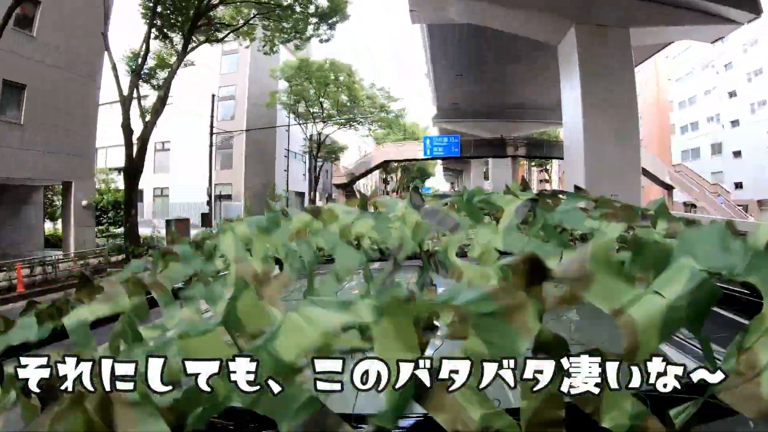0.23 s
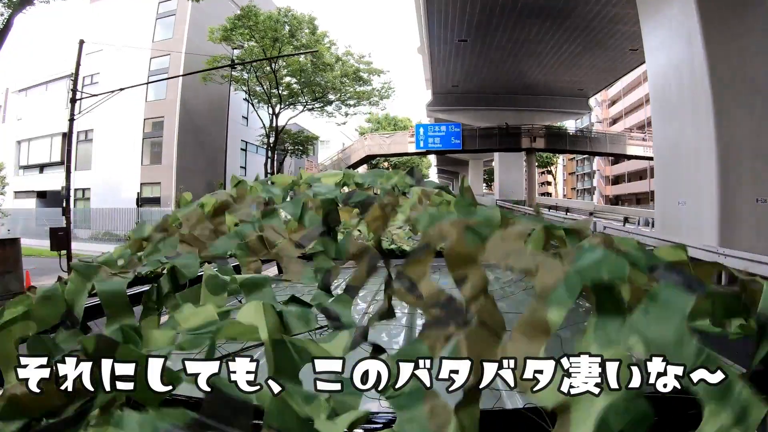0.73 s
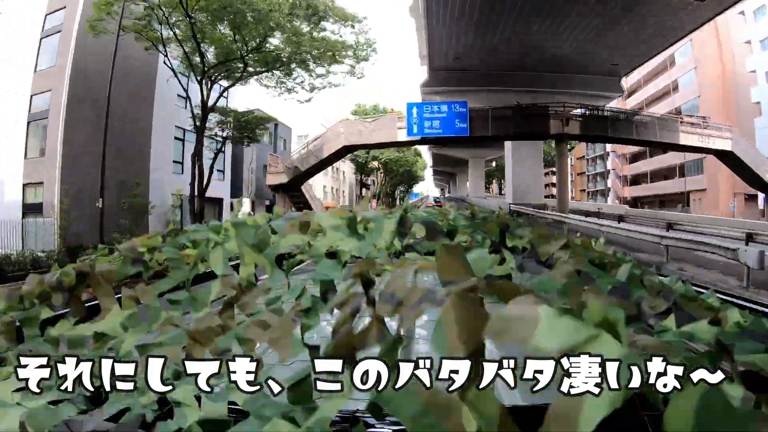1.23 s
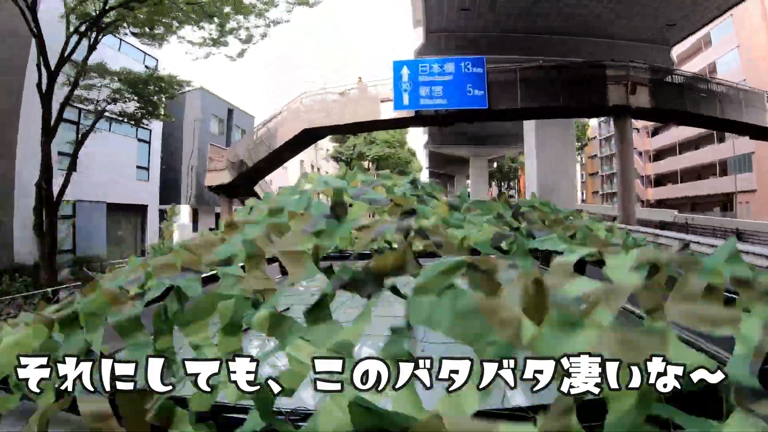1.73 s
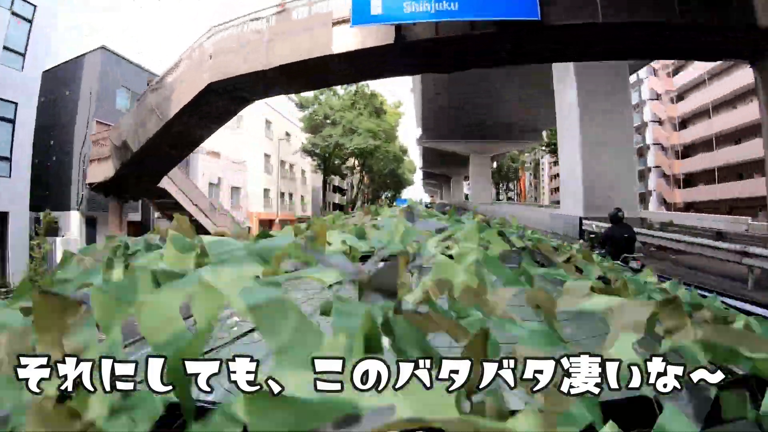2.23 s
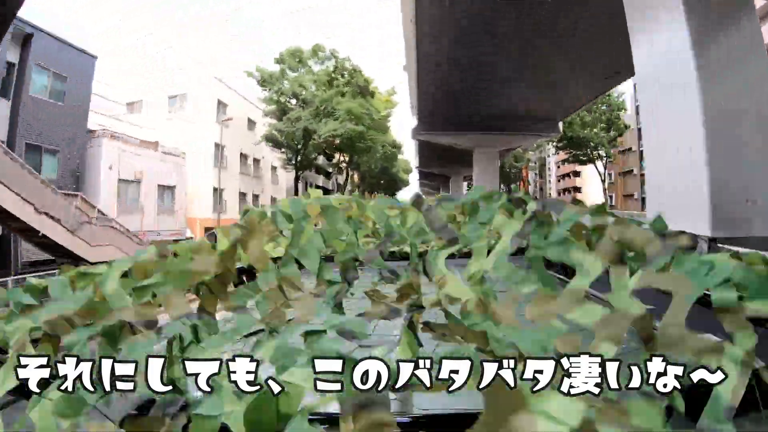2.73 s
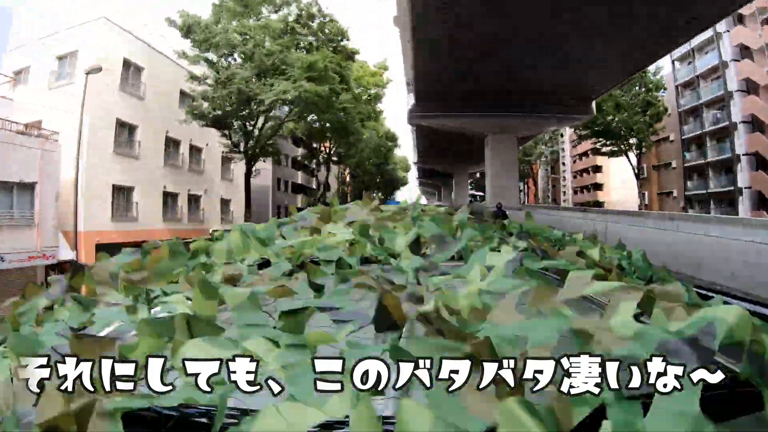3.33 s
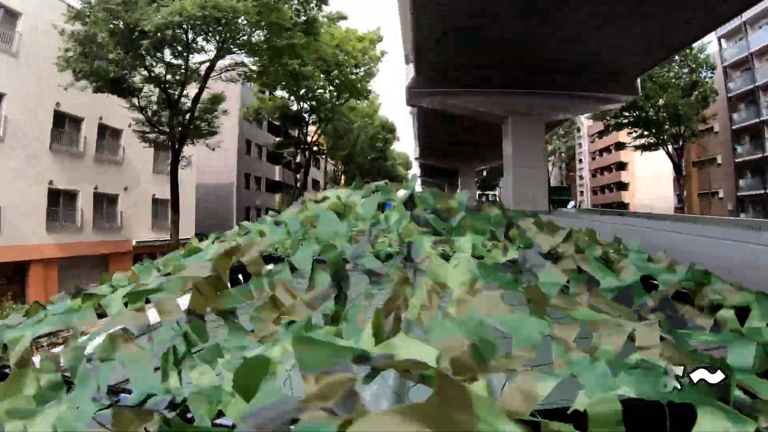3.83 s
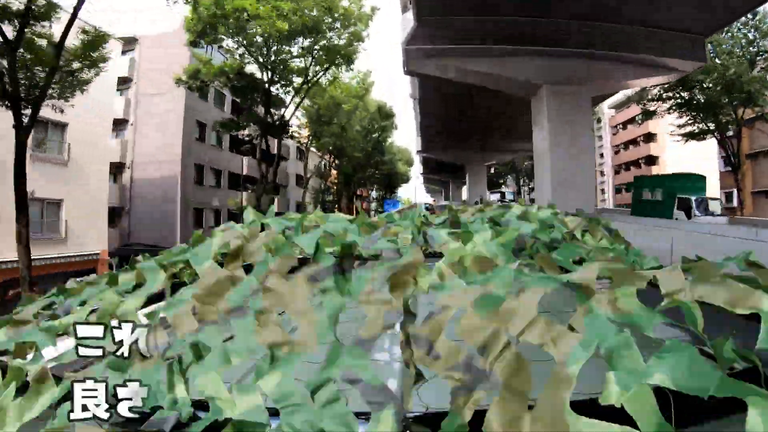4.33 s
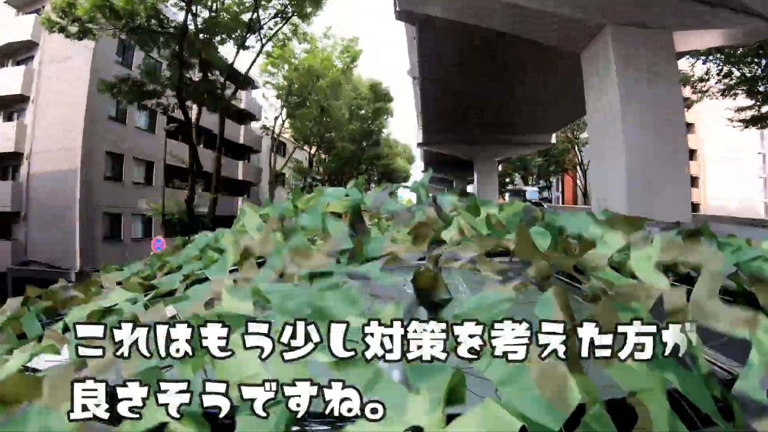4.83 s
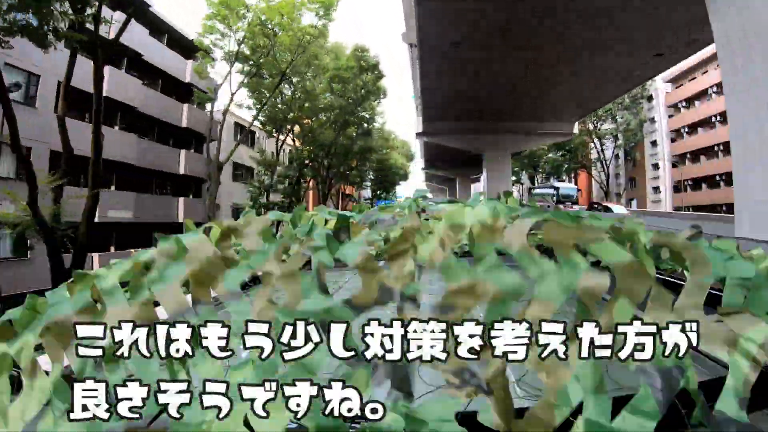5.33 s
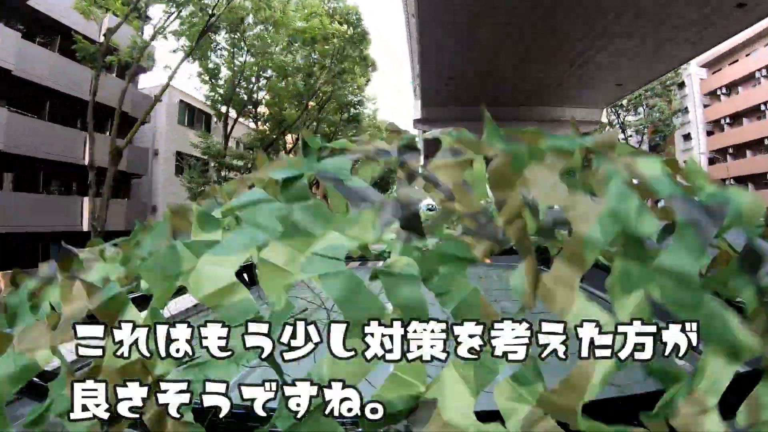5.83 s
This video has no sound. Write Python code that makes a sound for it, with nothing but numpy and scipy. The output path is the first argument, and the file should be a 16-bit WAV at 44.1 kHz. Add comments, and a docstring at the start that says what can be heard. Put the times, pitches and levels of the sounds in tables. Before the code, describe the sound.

A loose net of cloth leaves thrashes in strong wind on a moving car's roof, with the microphone right beside it. From the start, deep rumbling buffets thump the microphone about ten times a second, uneven in weight and pitch, over a turbulent low airflow. Folds whip taut with soft puffs, flat slaps and short dry cracks, while many small strips flutter in a papery rustle. A sharp close leaf snap comes at 0.1 s and a strong slap at 0.5. Rustling is fullest around 1 to 2 s. Flaps thin briefly near 2.7 and 3.1 s, then crowd into rapid clattering bursts at 3.7 to 3.9 and 4.1 to 4.4 s. Irregular slaps continue, with another close brush near 5.4 s, and wind and flapping run on to the cut at about 6 s. Everything is close, dry, bass-heavy and compressed, with only faint hiss and slight roof drumming.

```python
"""On the roof of a car driving into strong wind, a leafy camouflage net flaps close to one microphone.
Eddies, given as shaped noise, rumble on the microphone port, and the net sheds smaller ones.
Many leaves flutter as trains of ticks over rubbing noise; resonances drum in the roof.
Folds flap as bursts of noise (puff, slap, crack) with a pressure jolt, and a few leaves snap nearby.
A limiter holds the blows down and a low-pass filter cuts the top."""
import sys
import numpy as np
from scipy import signal
from scipy.fft import rfft, irfft, next_fast_len
from scipy.io import wavfile
from scipy.ndimage import uniform_filter1d, minimum_filter1d

SR = 44100
rng = np.random.default_rng(int(sys.argv[2]) if len(sys.argv) > 2 else 0)


def int16_out(signal):
    """Quantize to a 16-bit WAV file."""
    q = np.round(np.clip(np.atleast_2d(signal).T, -1, 1) * 32767)
    wavfile.write(sys.argv[1], SR, q.astype(np.int16))


N = 267598
TIME = np.arange(N) / SR

# Event and envelope levels are those before the trims set in the source functions.
# steady air stream between the blows: t/s, rumble level/dB, billowing level/dB
AIR_STREAM = [(0.0, -35, -59), (0.07, -27.5, -39), (0.2, -39, -31.5), (0.5, -39, -44), (0.6, -26.5, -31),
              (0.85, -26, -27), (1.15, -30, -27), (1.6, -33, -25.5), (2.15, -29, -26.5), (2.3, -29, -27.5),
              (2.85, -32, -34), (3.12, -32.5, -29.5), (3.24, -24.5, -28.5), (3.7, -28, -27.5),
              (4.24, -30.5, -28.5), (4.8, -30.5, -27), (5.55, -30, -25.5), (5.9, -31, -27.5),
              (6.07, -24, -28.5)]
# gusts that thump the microphone: t/s, length/s, deep level/dB, upper level/dB, pitch f/Hz
GUST_BUFFETS = [(0.006, 0.0083, -28, -14, 80.6), (0.123, 0.024, -20, -16.5, 97.5),
                (0.197, 0.016, -26, -10.5, 88.1), (0.27, 0.028, -19, -14, 118.5),
                (0.374, 0.017, -13, -12, 115.4), (0.467, 0.025, -28, -13.5, 78.9),
                (0.51, 0.023, -14, -15, 83.9), (0.676, 0.022, -17.5, -17.5, 76.7),
                (0.773, 0.018, -23, -15.5, 91.7), (0.857, 0.044, -18, -20, 82.2),
                (0.95, 0.03, -14.5, -27, 74.6), (1.018, 0.02, -20, -15.5, 79),
                (1.091, 0.052, -19, -17.5, 110.8), (1.192, 0.053, -14.5, -24, 69.9),
                (1.326, 0.043, -19.5, -20.5, 67.77), (1.416, 0.066, -19, -15, 93.14),
                (1.529, 0.066, -16, -16.5, 102.7), (1.632, 0.016, -22, -20, 81.05),
                (1.719, 0.015, -29, -12, 89.2), (1.784, 0.018, -13, -23, 71.1),
                (1.874, 0.064, -17.5, -22, 61.87), (1.963, 0.063, -28, -14.5, 79.2),
                (2.109, 0.046, -16.5, -16.5, 94.8), (2.226, 0.014, -20, -14.5, 97),
                (2.286, 0.014, -28, -25, 65.85), (2.353, 0.023, -16.5, -16, 82.7),
                (2.412, 0.012, -21, -20, 64.5), (2.484, 0.035, -22, -14, 93),
                (2.579, 0.045, -28, -14.5, 91.7), (2.619, 0.015, -19.5, -25, 77.95),
                (2.726, 0.013, -23, -17, 102.5), (2.779, 0.023, -16, -17.5, 78.8),
                (2.888, 0.044, -21, -13.5, 81.4), (3.01, 0.03, -27, -18.5, 97), (3.2, 0.023, -26, -19, 97),
                (3.277, 0.034, -26, -22, 111.1), (3.378, 0.024, -20, -20, 69.2),
                (3.448, 0.015, -17, -17, 73), (3.536, 0.036, -29, -15, 78.76),
                (3.593, 0.046, -26, -17, 90.96), (3.682, 0.03, -24, -21, 110),
                (3.784, 0.037, -23, -14.5, 130.4), (3.844, 0.019, -14.5, -16, 97),
                (3.968, 0.019, -13.5, -23, 73.6), (4.052, 0.027, -14, -18.5, 84.1),
                (4.144, 0.022, -14, -23, 72.2), (4.315, 0.05, -18.5, -14, 109.9),
                (4.405, 0.024, -17, -12, 94.8), (4.505, 0.031, -16.5, -17.5, 93),
                (4.615, 0.022, -18.5, -20.5, 64.13), (4.727, 0.031, -21, -17, 82.7),
                (4.825, 0.015, -25, -15.5, 105.5), (4.9, 0.022, -23, -15, 67.48),
                (4.979, 0.036, -29, -17, 101.4), (5.061, 0.011, -13.5, -19.5, 81.8),
                (5.139, 0.029, -19, -18, 85.3), (5.214, 0.036, -20, -22.5, 68.8),
                (5.335, 0.025, -22, -12, 86.6), (5.437, 0.038, -19, -17, 70.4),
                (5.524, 0.022, -30, -17, 88.5), (5.599, 0.05, -16, -19, 98.1), (5.718, 0.011, -14, -18, 72),
                (5.804, 0.025, -15, -15, 93.8), (6.025, 0.028, -16, -14, 92)]
# fluttering of the leaves: t/s, rustle level/dB, crisp edge level/dB
LEAF_FLUTTER = [(0.0, -43, -64), (0.25, -42, -59), (0.75, -41, -61), (0.9, -37, -61), (1.1, -35.5, -61),
                (1.45, -35.5, -64), (2.05, -38, -55), (2.3, -43.5, -55), (2.55, -40.5, -60),
                (2.9, -42, -61.5), (3.4, -39, -74), (3.7, -41.5, -83), (4.65, -46.5, -68.5),
                (5.2, -45, -62.5), (5.7, -46, -70), (6.07, -42, -66)]
# highest hiss of the leaves: t/s, level/dB
LEAF_SHEEN = [(0.0, -70), (0.25, -64.5), (0.75, -66.5), (0.9, -63), (1.1, -58), (1.45, -60.5),
              (2.05, -61.5), (2.3, -64.5), (2.55, -65.5), (2.9, -70), (3.4, -69), (3.7, -72.5), (4.65, -73),
              (5.2, -67.5), (5.7, -71.5), (6.07, -65.5)]
# resonances of the car roof under the net: f/Hz, bandwidth/Hz, level/dB relative to the rustle column
ROOF_MODES = [(546, 29, -14), (1000, 27, -15.5), (1619, 12, -12)]
# leaves snapping beside the microphone: t/s, level/dB, decay/s
LEAF_SNAPS = [(0.119, -26.5, 0.0079), (0.131, -44, 0.005), (4.160, -41, 0.0055), (4.618, -57, 0.006),
              (5.352, -41, 0.015), (5.388, -47, 0.032), (5.455, -55, .006)]
# hard flaps of whole folds: t/s, length/s, thud level/dB, slap level/dB, crack level/dB
FOLD_FLAPS = [(0.117, 0.0083, -31, -22.5, -26), (0.183, 0.012, -21, -28, -33.5),
              (0.204, 0.0083, -34, -20, -32), (0.251, 0.0044, -16.5, -38.0, -39),
              (0.262, 0.018, -21, -24, -30), (0.288, 0.016, -33, -27, -34), (0.299, 0.006, -31, -19, -27.5),
              (0.364, 0.015, -15.5, -24, -33), (0.387, 0.0092, -28, -24, -30),
              (0.428, 0.045, -25.5, -28, -38.5), (0.462, 0.008, -36, -21, -37),
              (0.502, 0.0042, -14.5, -10.5, -42), (0.62, 0.0064, -19, -37, -42),
              (0.678, 0.0048, -23, -15.5, -47), (0.727, 0.0051, -27, -24.5, -49),
              (0.776, 0.0053, -16.5, -28, -47), (0.84, 0.01, -16.5, -30, -35),
              (0.866, 0.0055, -24, -21.5, -36), (0.902, 0.0077, -15.5, -22, -35),
              (0.974, 0.011, -17.5, -20.5, -40), (1.018, 0.0046, -24, -16.5, -22.5),
              (1.054, 0.0085, -14, -27, -30), (1.103, 0.022, -17.5, -28, -27.5),
              (1.114, 0.01, -31, -23.5, -34), (1.143, 0.018, -30, -22, -45),
              (1.206, 0.035, -19.5, -25, -51), (1.316, 0.0056, -20, -26, -44),
              (1.35, 0.0049, -30, -27, -46), (1.434, 0.0098, -27, -20.5, -27.5),
              (1.494, 0.016, -23.5, -24, -30), (1.546, 0.019, -34, -22.5, -29.5),
              (1.635, 0.0054, -17.5, -40, -28), (1.685, 0.0037, -32, -16, -42),
              (1.729, 0.027, -35, -26, -32.5), (1.768, 0.0077, -25, -31, -36),
              (1.789, 0.006, -24, -23, -41), (1.848, 0.007, -22.5, -37, -49), (1.89, 0.0069, -27, -19, -29),
              (1.998, 0.023, -23.5, -22.5, -35), (2.083, 0.015, -16.5, -43, -28),
              (2.143, 0.0088, -21, -24, -29.5), (2.177, 0.021, -22.5, -20, -32),
              (2.359, 0.0069, -18, -33, -35), (2.483, 0.0042, -25, -15.5, -33),
              (2.491, 0.006, -25, -29, -30), (2.52, 0.0037, -17.5, -25, -45),
              (2.606, 0.016, -18.5, -22.5, -32.5), (2.88, 0.029, -26, -26, -35),
              (2.915, 0.017, -17.5, -25, -35), (2.932, 0.0087, -32.0, -24, -29.5),
              (2.994, 0.015, -17, -31, -35), (3.186, 0.0066, -20, -41, -41),
              (3.225, 0.009, -18.5, -29, -36), (3.276, 0.0046, -28, -25, -35),
              (3.295, 0.0057, -16, -32, -36), (3.364, 0.016, -15, -34, -32.5),
              (3.435, 0.013, -14.5, -20, -33.5), (3.465, 0.0045, -20, -35, -29),
              (3.553, 0.03, -16.5, -23.5, -32.5), (3.576, 0.0047, -23.5, -17, -25),
              (3.598, 0.0088, -30, -22, -31.5), (3.652, 0.012, -19, -30, -41),
              (3.726, 0.0058, -19, -33, -42), (3.758, 0.0084, -17.5, -21, -27),
              (3.777, 0.0051, -15, -20, -25.5), (3.785, 0.005, -16, -18, -26),
              (3.795, 0.004, -18, -19, -30), (3.821, 0.004, -17, -20, -34), (3.827, 0.005, -17, -22, -29),
              (3.842, 0.0071, -18.5, -23, -27), (3.858, 0.0034, -14, -17.5, -40),
              (3.945, 0.0064, -14.5, -18, -35), (3.96, 0.0044, -33, -20, -28.5),
              (4.133, 0.019, -24, -21.5, -43), (4.139, 0.025, -17.5, -27, -30),
              (4.156, 0.009, -18, -20, -26), (4.166, 0.0065, -18, -20, -26),
              (4.178, 0.0049, -13, -14, -23.5), (4.293, 0.0036, -14.5, -15.5, -35),
              (4.307, 0.0084, -21, -27, -25.5), (4.321, 0.0057, -17, -24, -26.5),
              (4.335, 0.009, -21, -22, -26.5), (4.357, 0.014, -23.5, -17, -30),
              (4.376, 0.0052, -26, -15, -32), (4.382, 0.0047, -21, -14.5, -20),
              (4.392, 0.0035, -22, -17.5, -32), (4.423, 0.0053, -14, -17.5, -34),
              (4.454, 0.0075, -23, -25, -48), (4.497, 0.024, -19.5, -24.5, -39),
              (4.525, 0.0038, -19, -27, -21.5), (4.535, 0.0069, -24, -21, -34),
              (4.561, 0.0041, -30, -20, -42), (4.617, 0.0047, -26, -21.5, -38),
              (4.703, 0.0073, -20, -15.5, -30), (4.736, 0.0047, -26, -23, -46),
              (4.789, 0.0085, -27, -25, -38), (4.813, 0.0073, -24, -24, -33),
              (4.9, 0.0088, -19.5, -29, -42), (4.919, 0.0041, -15, -23, -44),
              (4.936, 0.0047, -17.5, -20, -30), (4.949, 0.007, -18, -27, -32),
              (4.989, 0.0053, -29, -28.5, -40), (5.048, 0.009, -20.5, -26, -44),
              (5.126, 0.004, -23, -24, -37), (5.135, 0.009, -20.5, -21, -30.5),
              (5.174, 0.014, -17.5, -21.5, -32), (5.243, 0.0056, -30, -26, -44),
              (5.348, 0.004, -24, -18, -23.5), (5.356, 0.008, -23, -17.5, -26),
              (5.453, 0.0061, -19.5, -17, -28.5), (5.466, 0.0031, -30, -21, -25.5),
              (5.528, 0.012, -25, -30, -33), (5.543, 0.018, -31, -26, -44.0),
              (5.615, 0.011, -20, -30, -37.5), (5.724, 0.0075, -30, -37, -33),
              (5.819, 0.0061, -19, -25, -31), (5.9, 0.0045, -20, -32, -45),
              (5.975, 0.0078, -28, -35, -33.5), (6.009, 0.004, -23, -14.5, -35),
              (6.035, 0.018, -20, -22, -31)]

# Noise spectra, of which only the shape counts: f/Hz, level per Hz/dB
# deep and upper rumble of the wind, then the eddies shed by the waving net
DEEP_SPECTRUM = [(12, -16.5), (25, -3), (50, -3.5), (70, -9), (110, -30), (500, -62.5), (8000, -130)]
RUMBLE_SPECTRUM = [(30, -13), (55, -3), (85, 3), (122, 0), (170, -13.5), (250, -18), (500, -33.5),
                   (1500, -77), (8000, -120)]
BILLOW_SPECTRUM = [(70, -15.5), (140, -3), (200, 1), (280, -3), (400, -7), (560, -12), (900, -15.5),
                   (1500, -22.5), (2500, -33.5), (5000, -62), (14000, -120)]
# body, crisp edge and highest hiss of the leaves, then a snap beside the microphone: f/Hz, level per Hz/dB
RUSTLE_SPECTRUM = [(150, -16), (350, 6), (560, 8), (720, -1.5), (950, -1), (1200, -9), (1600, -3.5),
                   (2200, -5), (3000, -7.5), (4200, -13), (5100, -18), (5700, -27.5), (6800, -34.5),
                   (13000, -100)]
CRISP_SPECTRUM = [(2500, -3.5), (5000, 15), (6200, 3), (6800, -11), (9000, -42), (15000, -82.5)]
SHEEN_SPECTRUM = [(1000, -58.5), (5500, -14), (6800, -4.5), (7400, 4), (8200, 2), (9000, -4), (9800, -8.5),
                  (10800, -7.5), (12000, -15), (13200, -32), (15000, -60.5)]
SNAP_SPECTRUM = [(400, -16), (1200, -7), (2800, 5), (5000, -0.5), (7000, -9), (8500, -11.5), (10500, -20),
                 (12000, -31), (15000, -47)]
# a flap's puff of air, slap of the fold and crack of the cloth: f/Hz, level per Hz/dB
THUD_SPECTRUM = [(60, -15.5), (110, 5.5), (165, 8.5), (300, 2.5), (450, -6.5), (800, -19.5), (1400, -37),
                 (3000, -66), (12000, -110)]
SLAP_SPECTRUM = [(200, -12.5), (400, 8), (600, 7), (900, 0), (1300, -14.5), (2500, -24), (6000, -56.5),
                 (14000, -100)]
CRACK_SPECTRUM = [(500, -9.5), (1100, 7.5), (1700, 1.5), (2600, -6.5), (3600, -14.5), (4900, -23.5),
                  (6000, -40.5), (9000, -58), (14000, -91)]

# a surge rises from and falls to half power in these shares of its length
RISE_SHARE, FALL_SHARE = 0.54, 0.92
# the puff of air takes this much longer to fall to half power
THUD_LINGER_S = 0.0032
# spread of the slap's drifting pitch
SLAP_SPREAD_OCTAVES = 0.18
# light flaps: typical rate and length, levels over the rustle column, and random spread
LIGHT_FLAPS_PER_S, LIGHT_LENGTH_S = 30, 0.0044
LIGHT_THUD_DB, LIGHT_SLAP_DB, LIGHT_CRACK_DB, LIGHT_SPREAD_DB = 6.5, 6.5, 1.5, 2.0
CEILING_DB, CUTOFF_HZ = -3.5, 15400


def from_db(db):
    """Logarithmic level: 20 dB is a factor of ten in amplitude."""
    return 10 ** (np.asarray(db) / 20)


def rms_one(x):
    """Normalisation: scale a signal to unit mean power."""
    return x / np.sqrt(np.mean(x ** 2) + 1e-20)


def in_time(rows):
    """Linear interpolation: each column of a curve at every sample."""
    t, *columns = np.transpose(rows)
    return [np.interp(TIME, t, column) for column in columns]


def coloured(x, spectrum):
    """Spectral filtering: weight every frequency of x by a curve; rms 1."""
    size = next_fast_len(N)
    f, level_db = np.transpose(spectrum)
    bins = np.maximum(np.arange(size // 2 + 1) * SR / size, 1)
    gain = from_db(np.interp(np.log(bins), np.log(f), level_db))
    return rms_one(irfft(rfft(x, size) * gain, size)[:N])


def drift(rate):
    """Low-pass random process: noise under a Gaussian of width rate in Hz; rms 1."""
    size = next_fast_len(N)
    bins = np.arange(size // 2 + 1) * SR / size
    noise = rfft(rng.standard_normal(size))
    weight = np.exp(-.5 * (bins / rate) ** 2)
    return rms_one(irfft(noise * weight, size)[:N])


def turbulence(spectrum, steady_s, lumpy_db, eddy_rate):
    """Intermittency: noise, evened out in its slow swell, is modulated into short eddies; rms 1."""
    air = coloured(rng.standard_normal(N), spectrum)
    size = max(int(steady_s * SR), 2)
    power = uniform_filter1d(uniform_filter1d(air ** 2, size), size)
    steady = air / np.sqrt(power + 1e-9)
    return rms_one(steady * from_db(lumpy_db * drift(eddy_rate)))


def sped(x, speed):
    """Time scaling: reading x faster or slower from moment to moment moves its pitch."""
    return np.interp(np.cumsum(speed) % N, np.arange(N), x)


def swells(rows, linger_s=0.0):
    """Addition of powers: surges (t/s, length/s, level/dB) each rise faster than they fall."""
    power = np.zeros(N)
    for t, length, level_db in rows:
        near = slice(max(int((t - .1) * SR), 0), int((t + .25) * SR))
        age = TIME[near] - t
        rise = (age / (RISE_SHARE * length)) ** 2
        fall = np.abs(age / (FALL_SHARE * length + linger_s)) ** 1.49
        power[near] += .5 ** np.where(age < 0, rise, fall) * from_db(level_db) ** 2
    return power


def wind(stream_db=0.5, eddy_hz=89.92):
    """Turbulent pressure: eddies rumble on the microphone port, as buffets over a weak steady stream."""
    stream = from_db(in_time(AIR_STREAM)[0] + stream_db) ** 2
    t, length, deep_db, upper_db, pitch_hz = np.transpose(GUST_BUFFETS)
    deep_power = stream + swells(zip(t, length, deep_db))
    deep = np.sqrt(deep_power) * turbulence(DEEP_SPECTRUM, steady_s=0.022, lumpy_db=1.5, eddy_rate=40)
    eddies = turbulence(RUMBLE_SPECTRUM, steady_s=0.011, lumpy_db=1.65, eddy_rate=44)
    # eddy_hz is the pitch that leaves the speed at one; pitch glides from buffet to buffet
    pitched = sped(eddies, np.interp(TIME, t, pitch_hz) / eddy_hz)
    upper_power = stream + swells(zip(t, length, upper_db))
    return deep + np.sqrt(upper_power) * pitched


def billowing():
    """Eddy shedding: the waving net sheds smaller, lumpier eddies."""
    _, level_db = in_time(AIR_STREAM)
    return from_db(level_db) * turbulence(BILLOW_SPECTRUM, steady_s=0.043, lumpy_db=2.5, eddy_rate=104)


def resonance(x, f, width_hz):
    """Two-pole resonance: the pole radius sets the bandwidth, its angle the frequency; rms 1."""
    r = np.exp(-np.pi * width_hz / SR)
    poles = [1, -2 * r * np.cos(2 * np.pi * f / SR), r * r]
    return rms_one(signal.lfilter([1, 0, -1], poles, x))


def roof():
    """Resonant response: noise at the level of the flutter drums lightly on the roof panel."""
    body_db, _ = in_time(LEAF_FLUTTER)
    drumming = rng.standard_normal(N)
    return sum(from_db(body_db + db) * resonance(drumming, f, width) for f, width, db in ROOF_MODES)


def leaf_ticks(beat_hz, uneven, spread_db, count):
    """Superposed impulse trains: each leaf beats at its own uneven rate, in bouts; rms 1."""
    ticks = np.zeros(N)
    for leaf in range(count):
        rate = beat_hz * 2 ** rng.uniform(-1, 1)
        gaps, sizes, bouts = rng.standard_normal((3, 1024))
        at = (np.cumsum(np.exp(uneven * gaps)) * SR / rate).astype(int)
        swing = rms_one(uniform_filter1d(bouts, size=8))
        strength = from_db(spread_db * np.clip(swing, -2, 2)) * sizes
        ticks[at[at < N]] += strength[at < N]
    return rms_one(ticks)


def leaves(rustle_db=6.0, crisp_db=4.0, rub_db=4.0, waver_db=0.8, sheen_waver_db=1.6):
    """Broadband excitation: leaf ticks and rubbing fabric are filtered into body, crisp edge and sheen."""
    body_db, edge_db = in_time(LEAF_FLUTTER)
    ticks = leaf_ticks(beat_hz=45.13, uneven=.35, spread_db=1.0, count=32)
    rubbing = from_db(rub_db) * rng.standard_normal(N)
    flutter = (ticks + rubbing) * from_db(waver_db * drift(13.0))
    body = from_db(body_db + rustle_db) * coloured(flutter, RUSTLE_SPECTRUM)
    edge = from_db(edge_db + crisp_db) * coloured(flutter, CRISP_SPECTRUM)
    sheen_level_db = in_time(LEAF_SHEEN)[0] + sheen_waver_db * drift(25)
    sheen = from_db(sheen_level_db) * coloured(flutter, SHEEN_SPECTRUM)
    return body + edge + sheen


def snaps(rise_s=0.005):
    """Contact noise: a leaf brushes in, hits and slides off, with exponential growth and decay."""
    touch = np.zeros(N)
    for t, level_db, decay in LEAF_SNAPS:
        age = TIME - t
        exponent = np.minimum(age / rise_s, -age / decay)
        touch += from_db(level_db) * np.exp(np.maximum(exponent, -20))
    return touch * turbulence(SNAP_SPECTRUM, steady_s=.004, lumpy_db=3.0, eddy_rate=150)


def light_flaps(count=200):
    """Random point process: small folds flip at uneven intervals, harder with more flutter; rows as FOLD_FLAPS."""
    gap, length, strength, crack = rng.standard_normal((count, 4)).T
    t = np.cumsum(np.exp(.5 * gap)) / LIGHT_FLAPS_PER_S
    level_db = np.interp(t, TIME, in_time(LEAF_FLUTTER)[0]) + LIGHT_SPREAD_DB * strength
    crack_db = level_db + LIGHT_CRACK_DB + LIGHT_SPREAD_DB * crack
    rows = np.transpose([t, LIGHT_LENGTH_S * np.exp(0.4 * length), level_db + LIGHT_THUD_DB,
                         level_db + LIGHT_SLAP_DB, crack_db])
    return rows[t < TIME[-1]]


def pressure_jolts(t, level_db, jolt_db=6.0, jolt_s=0.00017):
    """Impulsive radiation: cloth stopped short gives one push and pull of pressure, of either sign."""
    jolts = np.zeros(N)
    for at, db, (width, side) in zip(t, level_db, rng.random((400, 2))):
        near = slice(max(int((at - .005) * SR), 0), int((at + .005) * SR))
        # each jolt is 0.7 to 2.3 times jolt_s wide
        phase = (TIME[near] - at) / (jolt_s * (.7 + 1.6 * width))
        pulse = phase * np.exp((1 - phase ** 2) / 2)
        jolts[near] += np.sign(side - .5) * from_db(db + jolt_db) * pulse
    return jolts


def flaps(slap_db=-2.88):
    """Sudden tension: a fold whips taut with a jolt amid its puff of air, slap and cloth crack."""
    t, length, thud_level_db, slap_level_db, crack_level_db = np.vstack([FOLD_FLAPS, light_flaps()]).T
    thud = swells(zip(t, length, thud_level_db), THUD_LINGER_S)
    slap = swells(zip(t, length, slap_level_db + slap_db))
    crack = swells(zip(t, length, crack_level_db))
    puff = np.sqrt(thud) * turbulence(THUD_SPECTRUM, steady_s=0.0047, lumpy_db=-1.0, eddy_rate=230)
    slap_noise = turbulence(SLAP_SPECTRUM, steady_s=0.0048, lumpy_db=2.0, eddy_rate=240)
    fold = np.sqrt(slap) * sped(slap_noise, 2 ** (SLAP_SPREAD_OCTAVES * drift(15)))
    cloth = np.sqrt(crack) * turbulence(CRACK_SPECTRUM, steady_s=0.0025, lumpy_db=3.0, eddy_rate=270)
    return puff + fold + cloth + pressure_jolts(t, crack_level_db)


def scene():
    """Superposition: the pressures of wind, roof and net add at one microphone."""
    return (wind() + billowing() + roof() + leaves() + snaps() + flaps())[None]


def limiter(x, ceiling_db=CEILING_DB, release_db_per_s=400, ahead_s=0.003):
    """Gain reduction: gain dips just ahead of each peak over the ceiling and recovers quickly."""
    size = max(int(ahead_s * SR), 1)
    over = np.maximum(20 * np.log10(np.abs(x) + 1e-9) - ceiling_db, 0)
    # the largest excess within ahead_s on either side
    over = -minimum_filter1d(-over, 2 * size + 1)
    release = release_db_per_s * TIME
    held = np.maximum.accumulate(over + release, axis=-1) - release
    return x * from_db(-uniform_filter1d(held, size))


def record(dry):
    """Limiting and low-pass filtering: blows are held down and the top is cut."""
    top_cut = signal.cheby2(12, 70, CUTOFF_HZ, fs=SR, output="sos")
    return signal.sosfilt(top_cut, limiter(dry))


dry = scene()
out = record(dry)
int16_out(out)
```